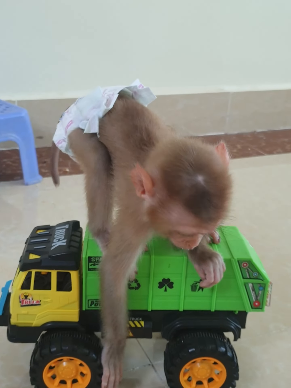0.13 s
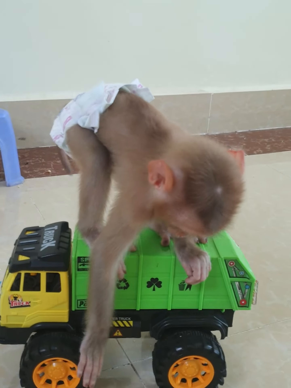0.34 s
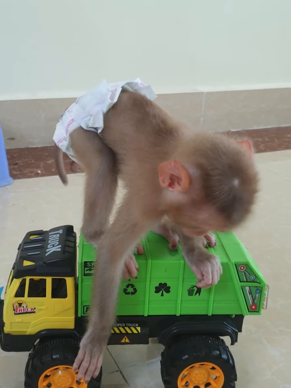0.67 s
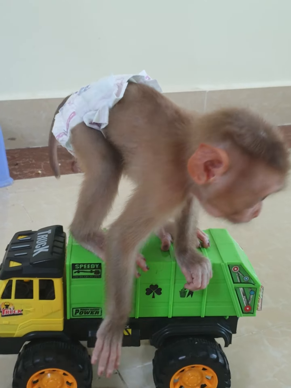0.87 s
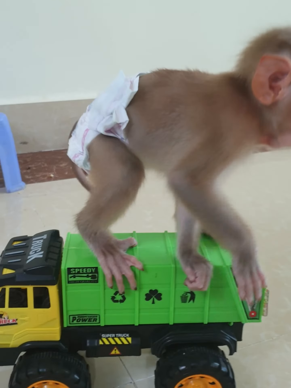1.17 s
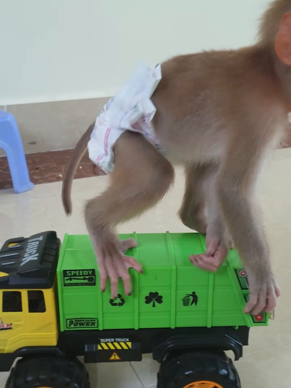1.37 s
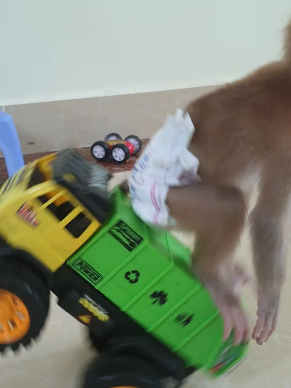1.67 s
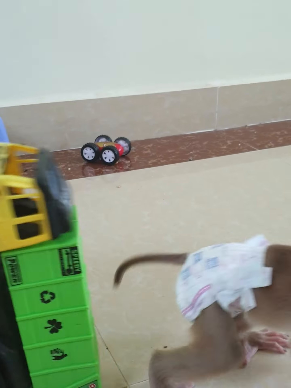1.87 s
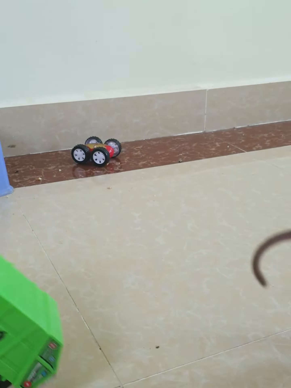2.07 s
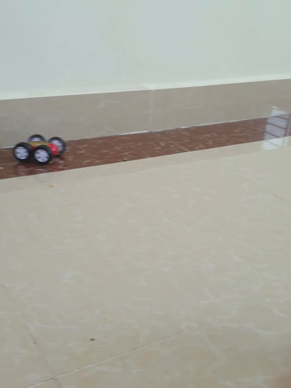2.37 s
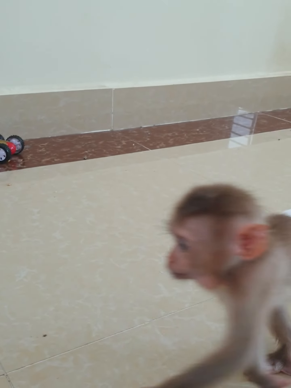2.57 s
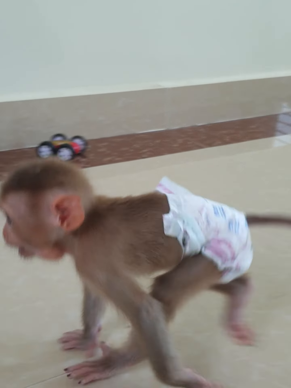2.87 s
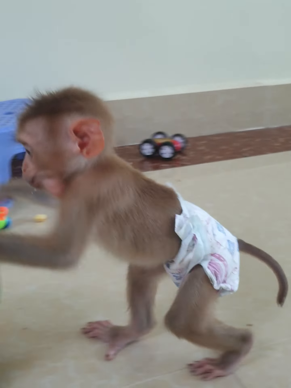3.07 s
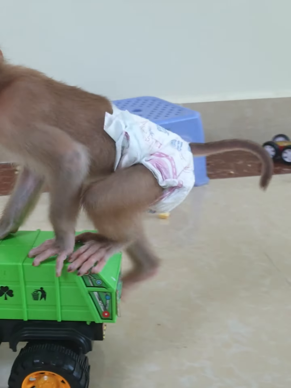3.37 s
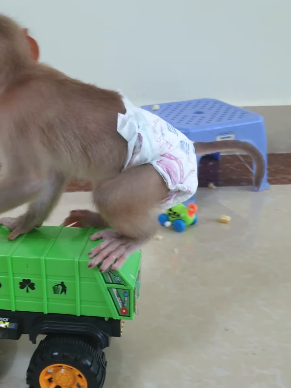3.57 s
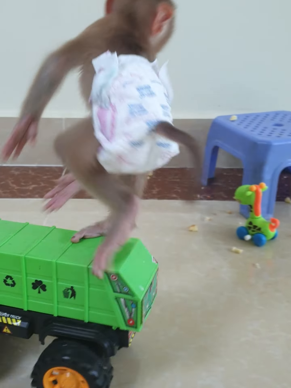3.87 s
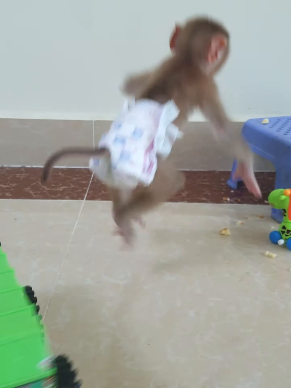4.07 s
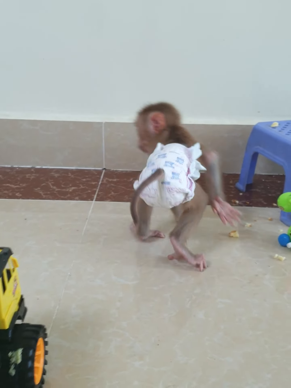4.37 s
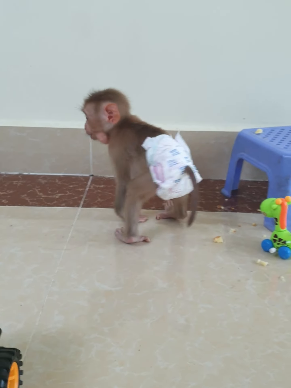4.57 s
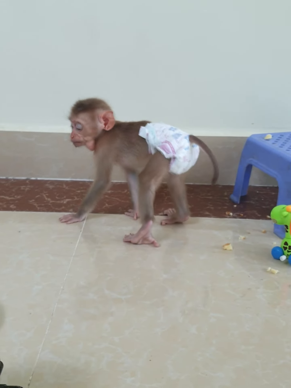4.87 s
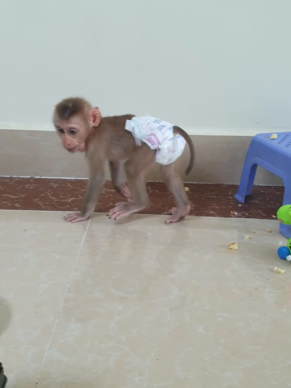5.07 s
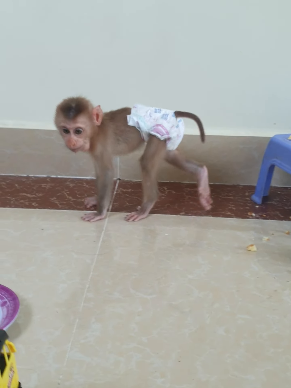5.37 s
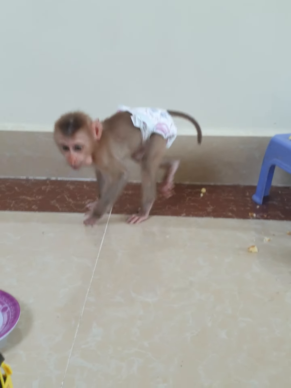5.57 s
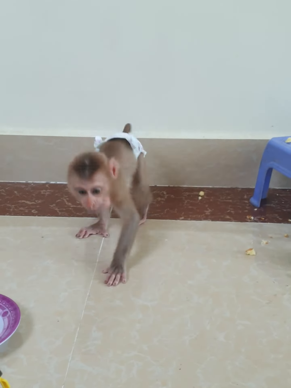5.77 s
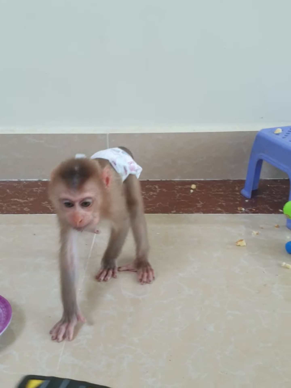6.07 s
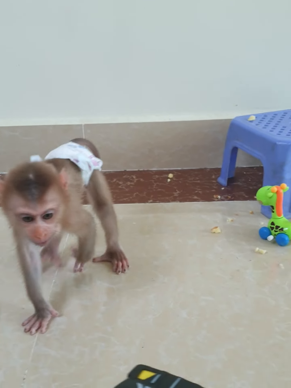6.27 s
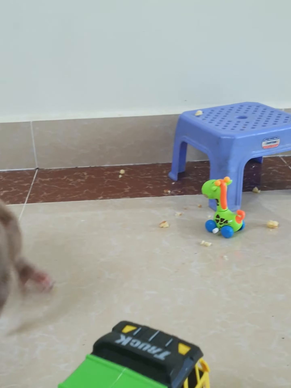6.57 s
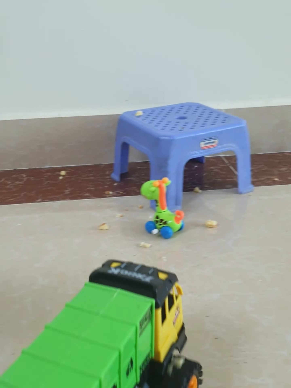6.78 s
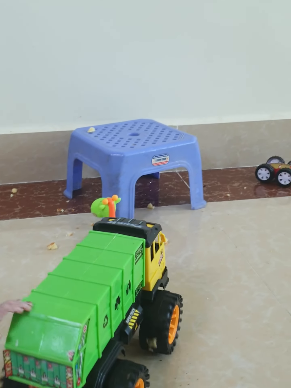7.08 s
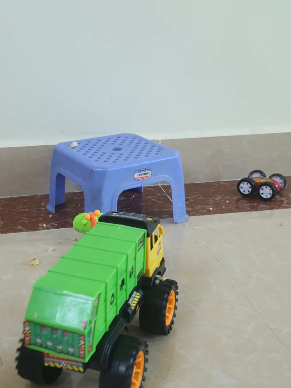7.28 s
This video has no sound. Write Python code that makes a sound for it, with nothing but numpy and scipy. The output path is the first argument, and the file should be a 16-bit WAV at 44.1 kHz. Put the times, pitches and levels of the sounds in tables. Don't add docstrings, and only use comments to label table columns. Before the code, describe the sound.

Near-silence with low distant rumble and faint ticks, then two very loud, cracking plastic knocks on tile, each chattering and ringing off hard walls. A lighter clatter of loose parts comes later and dies away. Close, dry bumps against the handheld microphone and soft rubbing lead to a toy truck jolting along with uneven wheels and ticking axles.

```python
import sys
import numpy as np
from scipy import signal
from scipy.fft import rfft, irfft
from scipy.io import wavfile
from scipy.ndimage import uniform_filter1d

SR = 44100
rng = np.random.default_rng(int(sys.argv[2]) if len(sys.argv) > 2 else 0)


def bounce(signal):
    frames = np.transpose(np.atleast_2d(signal))
    limited = np.clip(frames, -1, 1)
    pcm = np.round(limited * 32767).astype(np.int16)
    wavfile.write(sys.argv[1], SR, pcm)


def boost_factor(decibels):
    exponent = np.asarray(decibels, float) / 20
    return 10 ** exponent


N = 328104

# (time [s], level [dB])
RUMBLE = [(0.0, -50), (1.6, -49), (2.7, -60), (3.7, -48.5), (4.6, -51.5), (5.14, -47.5), (5.88, -50.5),
          (6.48, -44.5), (6.94, -46.5), (7.44, -48.5)]
# (frequency [Hz], density [dB per Hz])
RUMBLE_COLOUR = [(12, -55), (20, -46), (42, -2.5), (75, -2.5), (189, -7.5), (342, -18), (440, -14.5),
                 (492, -20.5), (566, -21.5), (994, -28.5), (1390, -38), (1790, -42), (3230, -48),
                 (15200, -62.5), (16500, -64)]
# (frequency [Hz], likeness [0-1])
RUMBLE_LIKENESS = [(60, 0.91), (240, 0.91), (950, 0.16), (3770, 0), (15000, 0.016)]
# (frequency [Hz], balance [dB])
RUMBLE_BALANCE = [(60, -4), (240, -1), (950, 3.5), (3770, -0.5), (15000, 0.5)]
# (frequency [Hz], phase [rad])
RUMBLE_LEAD = [(0, 0), (2760, 6.5), (8270, 31.5), (10900, 30), (16500, 63.5)]
BOOM_DB, BOOM_LAG_S, BOOM_FALL_S = -40.5, 0.14, 0.63

# (frequency [Hz], decay by 60 dB [s])
ROOM_T60 = [(100, 1), (260, 0.57), (700, 0.76), (1840, 0.8), (4850, 0.73), (12800, 0.65)]
# (frequency [Hz], gain [dB])
ROOM_GAIN = [(100, -14.5), (400, 1.5), (1500, 0), (5000, 3.5), (12000, -0.05)]
# (frequency [Hz], likeness [-1 to 1])
ROOM_LIKENESS = [(100, 0.43), (300, 0.61), (700, 0.21), (2000, -0.17), (10000, -0.039)]

# (time [s], knock [dB], thump [dB], snap [dB], left over right [dB])
TAPS = [(4.671, -49.5, -45.5, -82, -21), (4.69, -39.5, -63, -49, -9.5), (4.716, -40, -47, -72.5, -17),
        (4.744, -41.5, -48, -74, -29), (4.826, -49.5, -63, -71, -7), (4.97, -48.5, -56.5, -61, 5.5),
        (5.398, -27.5, -22, -53, -30), (5.413, -53, -58, -71, -8), (5.4327, -27, -22.5, -50, -27),
        (5.439, -51, -54, -48, 3), (5.448, -47, -40, -63, -1), (5.4591, -17.5, -23, -30.5, -25),
        (5.467, -35, -36, -38, -7), (5.505, -50, -56, -53, -12), (5.5256, -36.5, -30, -47, -5.5),
        (5.661, -63.5, -55.5, -58, 0), (5.843, -49, -35.5, -43.5, -14.5)]
# (peak time [s], rise [s], fall [s], level [dB])
CREAKS = [
    (5.394, .004, 0.032, -55.5),
    (5.404, .004, 0.037, -49),
    (5.457, 0.018, 0.0087, -31),
    (5.461, 0.0048, 0.0064, -24),
    (5.468, .004, 0.032, -41.5),
    (5.487, .003, .005, -50),
    (5.526, 0.017, 0.0059, -42),
]
CREAK_HZ, CREAK_WIDTH_HZ, CREAK_PAN_DB = 1800, 2600, -13

SWELL_DB = 20
# (peak time [s], rise [s], fall [s], level [dB], brightness [dB], half the gain from dull
SCUFFS = [(1.085, 0.025, 0.21, -76, -25), (1.31, 0.038, .4, -70, -6), (1.426, 0.053, .03, -76, 1),
          (3.57, 0.068, 0.06, -52, 2.5), (4.4, 0.022, 0.074, -79.5, -0.5), (4.69, 0.025, 0.16, -76, 7),
          (4.844, 0.026, 0.047, -59.5, 2), (5.04, 0.071, 0.29, -52.5, -1),
          (5.28, 0.68, 0.036, -59.5, -27.5), (5.53, 0.023, 0.045, -72, 6), (5.666, 0.071, 0.052, -75, -4),
          (5.85, .012, 0.22, -57.5, -1.5), (6.19, 0.0074, 0.082, -68.5, 12.5),
          (6.716, 0.16, 0.24, -56.5, 0), (6.9, 0.36, 0.67, -55, -2), (7.284, .7, 0.15, -72, 5)]
# (peak time [s], rise [s], fall [s], level [dB], brightness [dB], half the gain
SLIDES = [
    (0.352, 0.076, 0.14, -69, 3),
    (3.424, 0.23, 0.025, -58, 5),
    (3.46, 0.054, .15, -72.5, 13.5),
    (4.77, 0.096, 0.1, -70.5, 7.5),
    (5.11, 0.18, 0.051, -73.5, 14),
    (5.22, 0.11, 0.086, -68, 3),
    (5.96, 0.07, 0.25, -55, 5.5),
    (6.12, 0.15, 0.11, -60.5, 9.5),
    (6.22, 0.052, 0.067, -48.5, 5),
    (6.312, 0.038, 0.021, -54, 9.5),
]
# (centre [Hz], width [Hz], steepness [filter passes])
RUB_BANDS = [(1950, 2500, 3), (4600, 1900, 1), (7200, 2800, 1), (11500, 5600, 1)]
SCUFF_BANDS_DB = (1, -10, -8.5, -7.5)
SLIDE_BANDS_DB = (-8.5, -10.5, -10, -15)
# (start [s], length [s], pitch [Hz], arch [Hz], level [dB])
SQUEAKS = [
    (2.94, .22, 12750, 420, -72),
    (2.96, .24, 11650, 350, -78),
    (3.04, .14, 7550, 80, -87),
    (7.2, .14, 11250, 250, -78),
    (4.43, .36, 2450, 40, -75),
]
# (start [s], length [s], level [dB])
THUD = (4.165, .15, -46)

# (time [s], peak [dB], pitch [Hz])
TICKS = [
    (0.3082, -62, 3510),
    (0.3177, -63, 7140),
    (0.3247, -61, 3420),
    (0.3252, -64, 7100),
    (0.3541, -55, 3430),
    (0.3556, -57, 7180),
    (2.9347, -65, 3680),
    (5.7344, -69, 2860),
]
# (time [s], peak [dB], pitch
# [Hz])
THIN_TICKS = [(3.5795, -18.5, 1960), (3.6245, -28, 6130), (3.762, -32, 6000), (3.9705, -40, 1400),
              (4.0434, -41, 4200), (4.0554, -32, 5500), (4.0725, -34, 4800), (4.156, -39, 4300),
              (4.1694, -38, 5200), (4.2745, -38.5, 4700), (4.2894, -46, 4270), (4.4244, -60, 5170),
              (4.6886, -51, 2830), (4.9693, -50.5, 2680), (6.1925, -46.5, 2640), (6.666, -44, 4000),
              (6.822, -41, 6000), (6.921, -41.5, 6300), (2.0125, -24, 4580), (2.058, -27, 4860),
              (2.2935, -17, 4400)]
# (time [s], peak [dB], pitch [Hz])
AXLE_TICKS = [(6.3554, -39, 4700), (6.4053, -49, 3170), (6.4253, -39, 3940), (6.4577, -56, 3200),
              (6.4961, -40, 3270), (6.5246, -55, 3280), (6.6827, -37, 3850), (6.6904, -50, 2900),
              (6.7017, -33, 2950), (6.7344, -44, 3150), (6.7474, -47, 3760), (6.7694, -45, 4140),
              (6.8019, -32, 3770), (6.8214, -49, 3140), (6.8274, -40, 4120), (6.8374, -38, 4550),
              (6.8514, -51, 3270), (6.8774, -50, 3140), (6.8994, -43, 4440), (6.9074, -38, 4000),
              (6.9204, -46, 3960), (6.9354, -50.5, 4050), (6.9474, -51, 3150), (6.9644, -42, 4270),
              (6.9814, -43, 4700), (7.0074, -42, 4220), (7.0254, -38, 4300), (7.0394, -45, 3700),
              (7.0624, -39, 3880), (7.0994, -41.5, 3180), (7.1174, -39, 4060), (7.1277, -46, 4170),
              (7.1457, -53, 4030), (7.1614, -57, 3830)]
# (time [s], peak [dB], pitch [Hz])
PART_TICKS = [(1.2894, -57, 2300), (1.3424, -57.5, 2400), (1.3954, -58, 2500), (1.5394, -54, 1900),
              (3.5533, -49, 1485), (3.6014, -28, 1920), (3.6394, -27.5, 1700), (3.6544, -28, 1540),
              (3.6974, -17.5, 1592), (3.7144, -35, 1630), (3.7514, -19.5, 1950), (3.7664, -30, 2040),
              (3.7774, -25, 2660), (3.7994, -26, 1900), (3.8194, -37, 2020), (3.9244, -34.5, 2150),
              (4.0194, -47, 2020), (6.1962, -38.5, 3034), (6.549, -43, 1520)]
# (time [s], peak [dB], pitch [Hz])
REBOUNDS = [(1.777, -20, 470), (1.789, -36, 692), (1.801, -9.5, 692), (1.821, -21, 603), (1.837, -17, 618),
            (1.851, -17.5, 508), (1.894, -19, 590), (1.919, -18.5, 766), (1.932, -31, 590),
            (2.033, -27.5, 646), (2.282, -4, 1697), (2.304, -26, 550), (2.319, -27, 705),
            (2.349, -22.5, 684), (2.369, -15.5, 606), (2.414, -35, 980), (2.449, -31, 797),
            (2.489, -25.5, 561), (2.529, -27, 535), (2.574, -30.5, 802), (2.634, -32.5, 630),
            (6.46, -28, 697), (6.783, -23, 538), (6.825, -23, 600), (6.904, -25, 613), (7.035, -25.5, 925),
            (7.086, -23, 910)]
# (time [s], peak [dB], pitch [Hz])
CRACKS = [(1.693, -43, 4300), (1.724, -34, 776), (1.735, -37, 4500), (1.751, -33, 4000), (1.768, -5, 1289),
          (1.9035, -25, 4200), (2.2735, -5.5, 5100), (2.2765, -23, 6550), (2.279, -20, 4400),
          (2.394, -12.5, 1930), (3.6275, -23, 2400), (3.632, -36, 6200), (3.6915, -35, 6000),
          (3.707, -35, 5900), (3.748, -27, 6950), (3.868, -36, 2920), (3.908, -33, 6000),
          (3.9705, -34, 2160), (4.004, -29, 2570), (4.043, -46, 10000), (4.17, -40, 12500),
          (5.4385, -37, 4280), (5.468, -38, 3960), (5.487, -51, 1700), (6.406, -32, 2440),
          (6.4585, -47, 5400), (6.497, -48, 5400), (6.526, -39, 3300), (6.5505, -47, 2300),
          (6.73, -26, 1530), (6.803, -34, 5700), (6.805, -28, 1170), (6.946, -25, 1300),
          (7.084, -33.5, 890), (7.128, -47, 4200), (7.146, -43, 4150)]

# (time [s], level [dB])
ROLL = [
    [(1.685, -53), (1.726, -37), (1.76, -40)],
    [(5.83, -48.5), (6.0, -65.5)],
    [(6.34, -53), (6.376, -69), (6.63, -52), (6.685, -43.5), (6.722, -58), (6.844, -51), (6.908, -39.5),
     (7.132, -50.5), (7.294, -53), (7.44, -54)],
]
# (time [s], level [dB])
SHAKE = [
    [(3.52, -55), (3.62, -57), (3.72, -64), (3.752, -45), (3.87, -52), (3.946, -44.5), (4.128, -54),
     (4.35, -78.5)],
]
SETTLE_DB, SETTLE_RISE_S, SETTLE_FALL_S = -37.5, 0.02, 0.17

# (frequency [Hz], density [dB per Hz])
WHEELS = [(26, -38), (45, -7.5), (70, -6), (179, 1), (851, -3.5), (1170, -7), (1470, -11.5), (1740, -14),
          (11100, -45), (15300, -55), (16500, -63.5)]
# (centre [Hz], width [Hz], height [dB])
WHEELS_HUMPS = [(610, 460, 3.5), (866, 39, 0), (1520, 54, 7.5), (4400, 1900, 0.5)]
# (frequency [Hz], density [dB per Hz])
PARTS = [(120, -35.5), (200, -3), (1940, -6.5), (2290, -11), (2700, -10.5), (4620, -21.5), (5980, -24.5),
         (7740, -28.5), (15000, -26), (16500, -37.5)]
# (centre [Hz], width [Hz], height [dB])
PARTS_HUMPS = [(990, 110, 5), (1520, 36, 5.5), (1870, 29, 0.5), (2042, 49, 8), (2690, 120, 5.5),
               (4050, 300, 6), (6050, 500, 8), (14500, 1300, -5.5)]
# (frequency [Hz], density [dB per Hz])
SHELL = [(26, -44), (45, -18), (68, 8), (163, -5), (247, 0), (377, -8.5), (617, -4), (1330, -7), (1700, -6),
         (6780, -22.5), (11700, -27), (15300, -26), (16900, -41.5)]
# (centre [Hz], width [Hz], height [dB])
SHELL_HUMPS = [(72, 15, 5), (250, 40, 3), (600, 90, 4), (830, 70, 3), (1070, 80, 4), (1440, 80, 3),
               (1670, 110, 4), (1900, 90, 3)]

# (time [s], peak [dB], brightness [dB per octave], room [dB], own ring [Hz])
BUMPS = [(6.193, -31, 0.5, 8, 2990), (6.332, -13, 4.5, 1, 3310), (6.341, -21.5, -6, -20, 4620),
         (6.354, -29, 5, -21, 4560), (6.406, -26.5, -9, 1, 2480), (6.416, -29.5, 1, 10, 2300),
         (6.458, -34, -14, -12, 3220), (6.497, -33.5, 1, -17, 3100), (6.525, -35, 1, -22, 3200),
         (6.549, -40, 5.5, -15, 2280), (6.674, -33, 6, 13, 3950), (6.698, -25.5, 3.5, 7.5, 2550),
         (6.729, -19.5, 3, 11, 4280), (6.784, -42, 10, -11, 2770), (6.802, -19, 3.5, 9, 2180),
         (6.925, -47, -5, 10, 4000), (6.944, -24, 3, 9, 2330), (6.979, -36.5, 11, 11, 2690),
         (7.002, -27, 2.5, 7.5, 2430), (7.084, -44, -4, -8, 932), (7.124, -35.5, 5.5, 16.5, 3920),
         (7.161, -28, 3, -22, 3880)]
# (time [s], peak [dB], brightness [dB per octave], room [dB], own ring [Hz])
CLATTER = [(3.583, -13.5, 1.5, -4, 2230), (3.624, -20.5, 1.4, 2.5, 2260), (3.691, -17, 2, -3, 1610),
           (3.745, -15.5, 2, -2.5, 2070), (3.79, -32, 5, -19, 1920), (3.867, -29.5, 1.5, 0, 1780),
           (3.908, -22, 2.5, -1.5, 2035), (3.97, -31, -4.5, -6, 2130), (4.002, -19.5, 1.5, -2.5, 2530),
           (4.07, -37, 9.5, 6, 2040), (4.155, -36.5, -8, 4, 1310), (4.273, -37.5, -0.5, -14.5, 4600)]
# (time [s], peak [dB], brightness [dB per octave], room [dB], own ring [Hz])
KNOCKS = [(0.274, -58, -1, -8, 2400), (1.071, -32.5, -3, 2.5, 2000), (1.481, -37, -4, 9, 1760),
          (1.694, -31, -3.5, 8, 416), (1.724, -31, -1, 5, 604), (1.7647, 0, -2, -1.5, 1140),
          (1.904, -19, -1.5, -8.5, 746), (2.013, -13, 0.2, -1.5, 604), (2.057, -20.5, 0.5, -8, 603),
          (2.188, -36.5, -9, -7, 762), (2.2729, -2, 1.52, 1, 730), (2.296, -10.5, -8.5, -1, 587),
          (2.332, -17.5, 2, -1, 1640), (2.394, -17, 1, 8, 2090), (2.429, -19.5, -0.2, 2.5, 895),
          (3.051, -35.5, -13, 6, 299.5), (3.171, -44.5, -4, 12.5, 536), (3.43, -37.5, 1.5, 0, 1040)]
KNOCK_PAN_DB, CLATTER_PAN_DB, BUMP_PAN_DB, PAN_SCATTER_DB = 2.0, 0.4, 0.4, 5.0


def rms_one(x):
    return x / np.sqrt(np.mean(x ** 2) + 1e-20)


def in_time(tables, quiet=-140):
    t = np.arange(N) / SR
    out = np.full((len(tables[0][0]) - 1, N), float(quiet))
    for rows in tables:
        s, *columns = np.transpose(rows)
        inside = (t >= s[0]) & (t <= s[-1])
        out[:, inside] = [np.interp(t[inside], s, c) for c in columns]
    return out


def at_hz(points, hz):
    table_hz, values = np.transpose(points)
    return np.interp(np.log(hz + 1e-9), np.log(table_hz), values)


def soft(db):
    return uniform_filter1d(boost_factor(db), size=512)


def band(x, low_hz, high_hz):
    edges = [low_hz, min(high_hz, .45 * SR)]
    return signal.sosfilt(signal.butter(2, edges, "band", fs=SR, output="sos"), x)


def swell(peak_s, rise_s, fall_s, db):
    t = np.arange(0, N, 32) / SR - peak_s
    away = np.where(t < 0, -t / max(rise_s, 1e-3), t / max(fall_s, 1e-3))
    return boost_factor(db - SWELL_DB * away) ** 2


def together(swells):
    power = sum(swells)
    return np.interp(np.arange(N) / 32, np.arange(len(power)), np.sqrt(power))


def add(out, s, sound, pan_db, lag=0):
    start = round(s * SR)
    for side, i in ((0, start + lag), (1, start)):
        out[side, i:i + len(sound)] += sound[:N - i] * boost_factor(pan_db / 2 * (2.0 - 2 * side))


def rumble():
    hz = np.arange(N // 2 + 1) * SR / N
    left, other = rfft(rng.standard_normal((2, N)))
    alike = np.clip(at_hz(RUMBLE_LIKENESS, hz), 0, 1)
    right = alike * left + np.sqrt(1 - alike ** 2) * other
    right = right * np.exp(-1j * at_hz(RUMBLE_LEAD, hz))
    tilt = boost_factor(at_hz(RUMBLE_BALANCE, hz) / 2)
    noise = irfft(np.array([left * tilt, right / tilt]) * boost_factor(at_hz(RUMBLE_COLOUR, hz)), N)
    booms = [swell(s + BOOM_LAG_S, BOOM_LAG_S, BOOM_FALL_S, db + BOOM_DB) for s, db, *_ in KNOCKS]
    return np.hypot(boost_factor(in_time([RUMBLE])[0]), together(booms)) * rms_one(noise)


def hiss():
    return boost_factor(-79.5) * rms_one(band(rng.standard_normal((2, N)), 10000, 16500))


def room(x, first_s, build_s):
    t = np.arange(int(1.3 * SR)) / SR
    edges = 40 * 2 ** np.arange(0, 9, .5)
    white = rng.standard_normal((2, 2, len(t)))
    echo = 0
    for k, (low, high) in enumerate(zip(edges, edges[1:])):
        hz = np.sqrt(low * high)
        mid, side = band(white[k % 2], low, high)
        alike = np.clip(at_hz(ROOM_LIKENESS, hz), -1, 1)
        pair = np.sqrt(1 + alike) * mid + np.sqrt(1 - alike) * side * [[1], [-1]]
        echo = echo + pair * boost_factor(at_hz(ROOM_GAIN, hz) - 60 * t / at_hz(ROOM_T60, hz))
    onset = np.clip((t - first_s) / build_s, 0, 1)
    echo = echo * onset / np.sqrt(np.mean(np.sum(echo ** 2, axis=1)))
    return signal.fftconvolve(x[None], echo, axes=1)[:, :N]


def taps():
    out, t = np.zeros((2, N)), np.arange(1024) / SR
    for s, db, thump_db, snap_db, pan_db in TAPS:
        pulse = -np.sin(2 * np.pi * 1500 * t) * np.exp(-t / .00033)
        scrape = .08 * band(rng.standard_normal(1024), 900, 3000) * np.exp(-t / .004)
        knock = band(band(pulse + scrape, 40, 4200), 40, 6000)
        rebound = np.sin(2 * np.pi * 115 * t) * np.exp(-t / .0035) * (1 - np.exp(-(t / .0008) ** 2))
        snap = band(rng.standard_normal(1024), 3500, 14500) * np.exp(-t / .0012)
        tap = boost_factor(db + 11) * knock + boost_factor(thump_db + 5.5) * rebound + boost_factor(snap_db) * snap
        add(out, s, tap, pan_db)
    return out


def creaks():
    grains = rng.standard_normal((2, N)) * boost_factor(5 * np.minimum(rng.exponential(1, N), 3))
    for _ in range(2):
        grains = rms_one(band(grains, CREAK_HZ - CREAK_WIDTH_HZ / 2, CREAK_HZ + CREAK_WIDTH_HZ / 2))
    return together(swell(*row) for row in CREAKS) * grains * boost_factor(np.array([[CREAK_PAN_DB], [0]]))


def rubbing(grain_db):
    grains = rng.standard_normal((4, 2, N)) * boost_factor(grain_db * np.minimum(rng.exponential(1, N), 4))
    grains[:, 1] = 0.23 * grains[:, 0] + 3.3 * grains[:, 1]
    strokes = []
    for rows, bands_db in ((SCUFFS, SCUFF_BANDS_DB), (SLIDES, SLIDE_BANDS_DB)):
        for *shape, bright_db in rows:
            share = boost_factor(np.array(bands_db) + bright_db * np.linspace(0, 2, 4)) ** 2
            strokes.append((swell(*shape), share))
    out = 0
    for k, (g, (hz, width, steepness)) in enumerate(zip(grains, RUB_BANDS)):
        for _ in range(steepness):
            g = band(g, hz - width / 2, hz + width / 2)
        level = together(stroke * share[k] for stroke, share in strokes)
        hump = band(g, .85 * hz + .2 * width, .85 * hz + 0.53 * width)
        out = out + level * rms_one(g + .5 * hump)
    return out


def squeaks(wobble_hz, flutter_db):
    out = 0
    for s, length, hz, arch_hz, db in SQUEAKS:
        along = np.clip((np.arange(N) / SR - s) / length, 0, 1)
        tremble, slip = (rms_one(uniform_filter1d(rng.standard_normal(N), size=n)) for n in (100, 700))
        pitch = hz + arch_hz * np.sin(np.pi * along) + wobble_hz * tremble
        gain = soft(in_time([[(s, db), (s + length, db)]])[0] + flutter_db * slip)
        out = out + np.sqrt(2) * gain * np.sin(2 * np.pi * np.cumsum(pitch) / SR)
    return out


def thud():
    s, length, db = THUD
    unsteady = rms_one(uniform_filter1d(rng.standard_normal(N), size=900))
    phase = 2 * np.pi * np.cumsum(122 + 14 * unsteady) / SR
    level_db = in_time([[(s, db), (s + length, db + 2.0)]])[0]
    gain = soft(level_db + 2.5 * np.roll(unsteady, shift=9000))
    return gain * (1.5 * np.sin(phase) + 0.43 * np.sin(2 * phase))


def ticks():
    out, t = np.zeros((2, N)), np.arange(1024) / SR
    rounded = np.e * t / .001 * np.exp(-t / .001)
    for s, db, hz in TICKS:
        add(out, s, boost_factor(db) * np.sin(2 * np.pi * hz * t) * rounded, 0)
    return out[0]


def touches(events, cycles, under_db, crack, pan_db):
    out, t = np.zeros((2, N)), np.arange(1024) / SR
    strays = rng.uniform(-0.4, 1, (len(events), 2))
    noises = rng.standard_normal((len(events), 1024))
    for (s, db, hz), (near, place), noise in zip(events, strays, noises):
        neighbour_hz = hz * (1.25 + 0.2 * near)
        ring = np.sin(2 * np.pi * hz * t) + 0.37 * np.sin(2 * np.pi * neighbour_hz * t)
        snap = crack * band(noise, .6 * hz, 1.3 * hz) * np.exp(-t / .0017)
        add(out, s, boost_factor(db + under_db) * (ring * np.exp(-t * hz / cycles) + snap), pan_db + 4 * place)
    return out


def body(colour, humps, tilt_db, spread_db):
    hz = np.arange(2049) * SR / 4096
    db = at_hz(colour, hz) + tilt_db * np.log2(np.clip(hz, 300, None) / 1000)
    for centre, width, hump_db in humps:
        chance = np.clip(rng.normal(), -2, 1)
        shifted = centre * (1 + .03 * np.sin(7 * chance))
        db = db + (hump_db + spread_db * chance) / (1 + ((hz - shifted) / (width / 2)) ** 2)
    cepstrum = irfft(np.log(boost_factor(db)))
    cepstrum[1:2048] *= 2
    cepstrum[2049:] = 0
    return irfft(np.exp(rfft(cepstrum)))


def rattling(gain, colour, humps, per_s, size_db):
    sizes = boost_factor(size_db * np.minimum(rng.exponential(1, N), 3.5)) * rng.choice([-1, 1], N)
    clicks = sizes * (rng.random(N) < per_s / SR)
    spot = rng.integers(0, 4, N)
    rings = 0
    for k in range(4):
        rings = rings + signal.oaconvolve(clicks * (spot == k), body(colour, humps, 0, spread_db=3.0))[:N]
    return gain * rms_one(rings)


def blows(events, colour, humps, chatter_s, spread_db, own_db, low_hz, lag, pan_db):
    t, near, feed = np.arange(1024) / SR, np.zeros((2, N)), np.zeros((2, N))
    chatter = np.exp(-t / chatter_s) * (1 - np.exp(-t / .0012))
    for s, db, tilt_db, wet_db, own_hz in events:
        own_ring = (own_hz, .22 * own_hz, own_db)
        shape = body(colour, humps + [own_ring], tilt_db, spread_db)
        contact = band(rng.standard_normal(1024) * chatter, low_hz, SR)
        sound = signal.fftconvolve(shape, contact)
        sound *= boost_factor(db - 3.5) / np.abs(sound).max()
        add(near, s, sound, pan_db + PAN_SCATTER_DB * rng.uniform(-0.63, 1), lag)
        same_energy = np.sqrt(np.sum(sound ** 2) / np.sum(shape ** 2))
        add(feed, s, shape * boost_factor(min(wet_db, 9)) * same_energy, 0)
    return near, feed[0]


def scene():
    knock, knock_feed = blows(KNOCKS, SHELL, SHELL_HUMPS, chatter_s=.0045, spread_db=2.5, own_db=4.0,
                              low_hz=280, lag=4, pan_db=KNOCK_PAN_DB)
    clatter, clatter_feed = blows(CLATTER, PARTS, PARTS_HUMPS, chatter_s=.0052, spread_db=3.5, own_db=6.0,
                                  low_hz=200, lag=1, pan_db=CLATTER_PAN_DB)
    bump, bump_feed = blows(BUMPS, WHEELS, WHEELS_HUMPS, chatter_s=.003, spread_db=2.5, own_db=5.5,
                            low_hz=90, lag=8, pan_db=BUMP_PAN_DB)

    turning = soft(in_time(ROLL)[0])
    rolling = rattling(turning, WHEELS, WHEELS_HUMPS, per_s=420, size_db=3.2)
    after_knocks = together(swell(s + SETTLE_RISE_S, SETTLE_RISE_S, SETTLE_FALL_S, db + SETTLE_DB)
                            for s, db, *_ in KNOCKS)
    settling = rattling(after_knocks, SHELL, SHELL_HUMPS, per_s=200, size_db=4.2)
    loose = np.hypot(soft(in_time(SHAKE)[0]), boost_factor(-22.5) * turning)
    shaking = rattling(loose, PARTS, PARTS_HUMPS, per_s=400, size_db=3.0)

    squeak = boost_factor(-3) * squeaks(wobble_hz=130.0, flutter_db=4.0)
    far_beads = ticks()
    light = touches(AXLE_TICKS, cycles=7.9, under_db=-4.0, crack=0.79, pan_db=-7.0)
    light = light + touches(PART_TICKS, cycles=19.0, under_db=-7.0, crack=.6, pan_db=-1.5)
    light = light + touches(REBOUNDS, cycles=10.0, under_db=-11.0, crack=.4, pan_db=-1.0)
    thin_ticks = touches(THIN_TICKS, cycles=11.0, under_db=-2.5, crack=1.4, pan_db=-8.0)
    cracks = touches(CRACKS, cycles=3.1, under_db=-4.5, crack=1.0, pan_db=-1.0)

    direct = knock + clatter + bump + shaking + settling + thud() + squeak + far_beads + light + thin_ticks + cracks
    direct = direct + [np.roll(rolling, shift=8), rolling]
    feed = boost_factor(3.0) * knock_feed + boost_factor(5.0) * clatter_feed + boost_factor(-6) * bump_feed
    feed = feed + boost_factor(-1.0) * (rolling + shaking + settling)
    feed = feed + boost_factor(-6) * squeak + boost_factor(-17) * far_beads + boost_factor(-6.5) * light[1]
    wet = room(feed, first_s=0.0016, build_s=0.0012)
    return direct + wet + rubbing(grain_db=4.0) + taps() + creaks() + rumble() + hiss()


def roll_off(x):
    return signal.sosfilt(signal.butter(12, 16900, fs=SR, output="sos"), x)


def record(dry):
    cut = signal.sosfilt(signal.butter(3, 38, "high", fs=SR, output="sos"), dry)
    cut = signal.sosfilt(signal.cheby2(10, 30, 16600, fs=SR, output="sos"), cut)
    return roll_off(np.clip(cut, -1, 1))


dry = scene()
out = record(dry)
bounce(out)
```